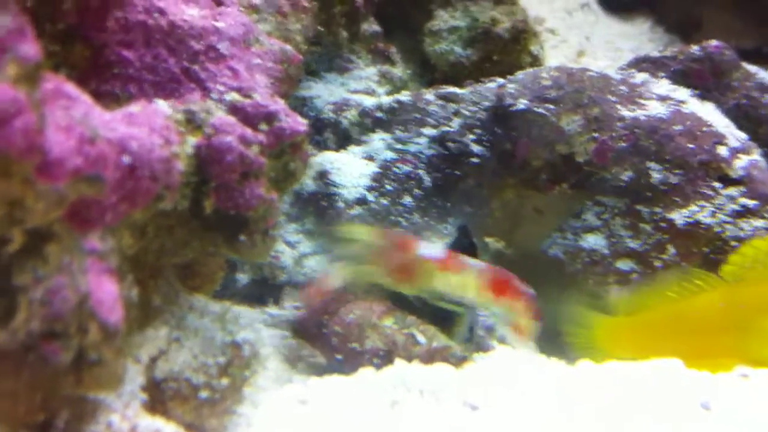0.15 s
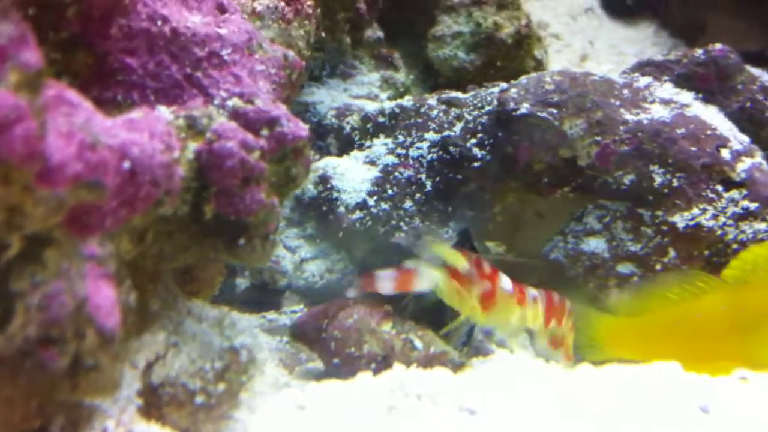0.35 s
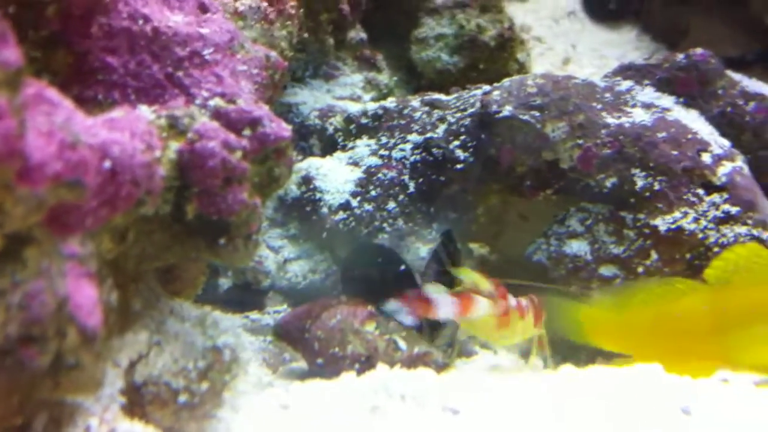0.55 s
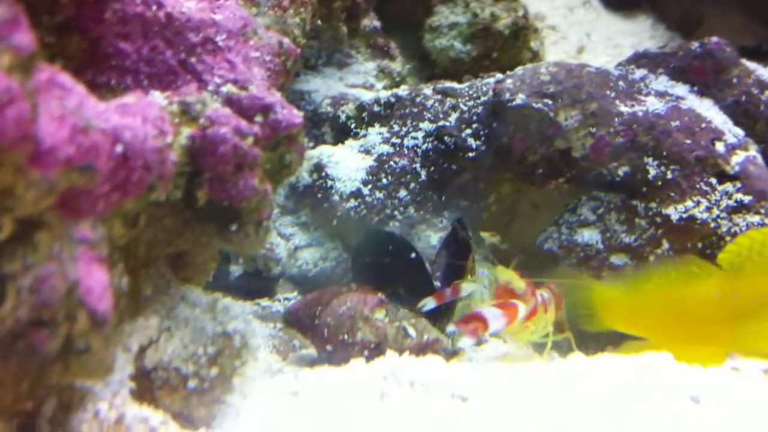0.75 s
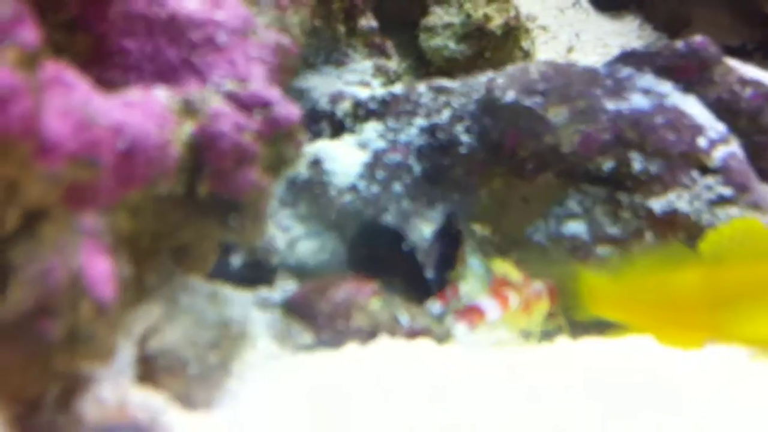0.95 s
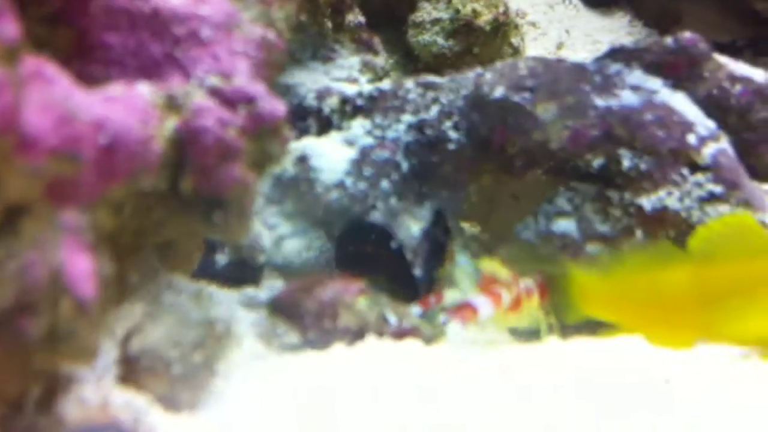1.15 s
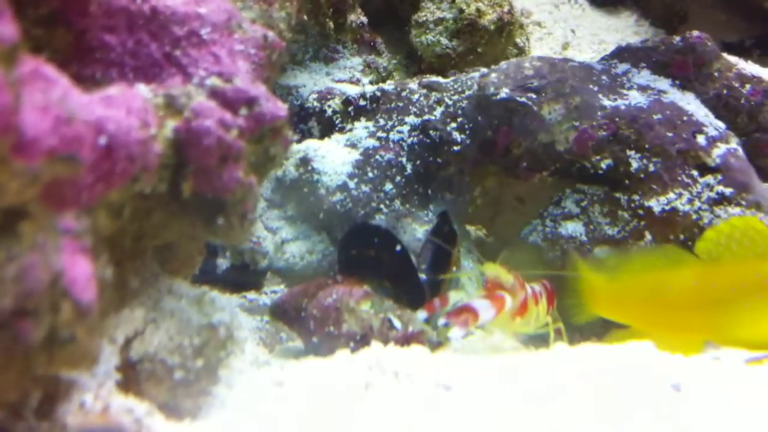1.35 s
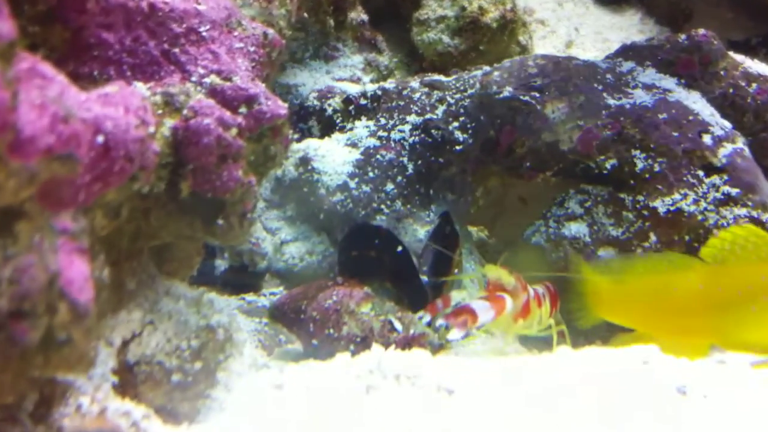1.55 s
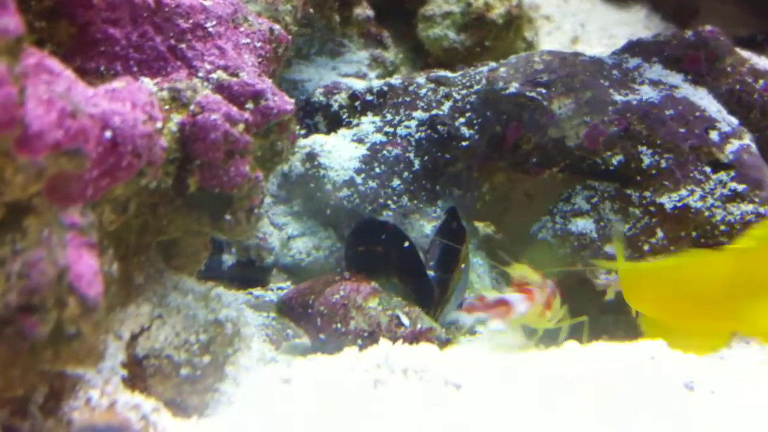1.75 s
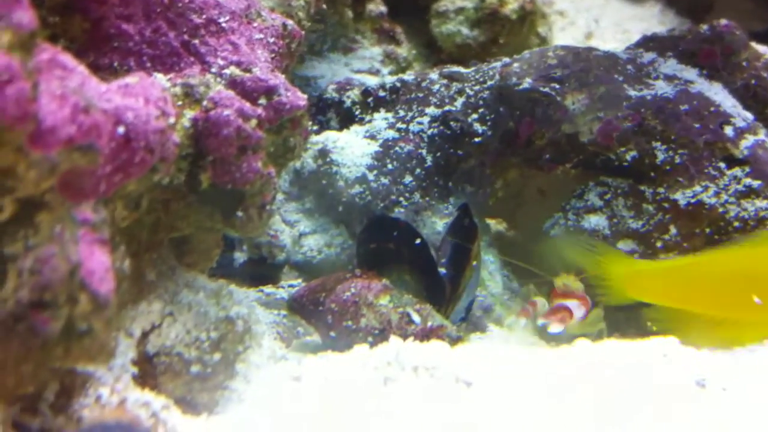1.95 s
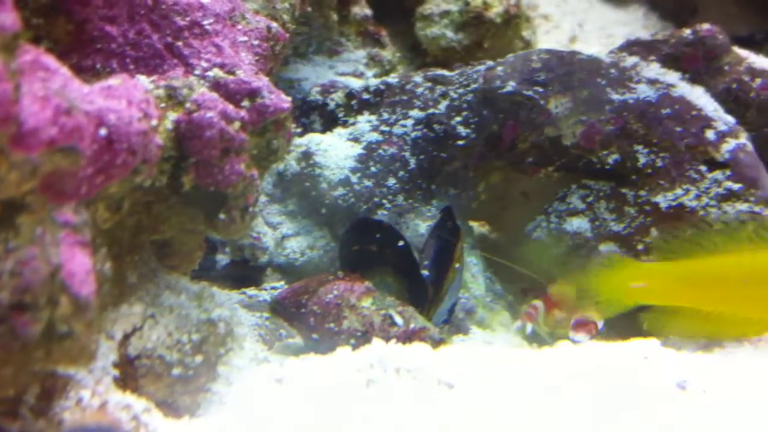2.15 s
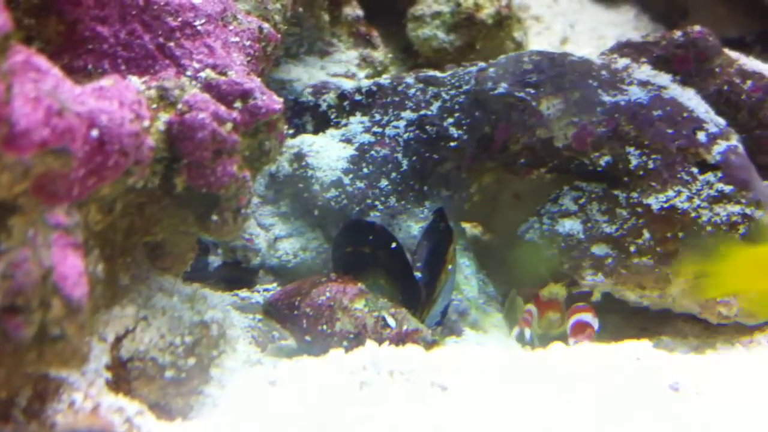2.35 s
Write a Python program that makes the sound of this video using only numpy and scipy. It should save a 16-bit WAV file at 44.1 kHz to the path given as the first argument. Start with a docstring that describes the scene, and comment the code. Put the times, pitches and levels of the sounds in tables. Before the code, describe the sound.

A pistol shrimp snaps once, very sharp and loud, near the start; the tank glass rings briefly and the room answers faintly. A quiet wavering pump hum and microphone hiss continue, with one tiny late tick.

```python
"""An aquarium pump runs throughout: wavering shaft sines, mains hum, churning noise, under microphone hiss.
At 0.2 s a pistol shrimp snaps: its bubble collapses in one sharp pulse, which rattles between the panes
as a few milliseconds of noise and rings the glass as decaying modes.
A near wall repeats the snap and the room answers with a faint tail of fading noise.
At 1.8 s one tiny tick sounds in the tank, a short noise burst."""
import sys
import numpy as np
from scipy import signal
from scipy.fft import rfft, irfft, next_fast_len
from scipy.io import wavfile
from scipy.ndimage import map_coordinates

SR = 44100
rng = np.random.default_rng(int(sys.argv[2]) if len(sys.argv) > 2 else 0)


def waveform_to_disk(signal):
    """Save audio, clipped to [-1, 1], as 16-bit WAV at the path in sys.argv[1]."""
    frames = np.transpose(np.atleast_2d(signal))
    scaled = np.clip(frames, -1, 1) * 32767
    samples = np.round(scaled).astype(np.int16)
    wavfile.write(sys.argv[1], SR, samples)


N = 110250


def amp(db):
    """Decibels to gain."""
    return 10 ** (np.asarray(db) / 20)


def unit(x):
    """Scale to rms 1."""
    return x / np.sqrt(np.mean(x ** 2) + 1e-20)


def along(points, hz):
    """Interpolate (freq_hz, value) points on a log-frequency axis."""
    point_hz, value = np.transpose(points)
    return np.interp(np.log(hz + 1), np.log(point_hz + 1), value)


def since(start_s):
    """Seconds since a moment, zero before it."""
    return np.maximum(np.arange(N) / SR - start_s, 0)


def wobble(knots_per_s):
    """Smooth random curve: a spline through normal random knots."""
    knots = rng.standard_normal(256)
    return map_coordinates(knots, [np.arange(N) * knots_per_s / SR], mode="mirror")


def filtered(x, response):
    """Multiply the spectrum of x by response(freq_hz), zero-padded."""
    size = next_fast_len(N + 8192)
    freq_hz = np.fft.rfftfreq(size, 1 / SR)
    return irfft(rfft(x, size) * response(freq_hz), size)[:N]


def noise(colour):
    """Noise of rms 1 with a (freq_hz, level_db) spectrum."""
    return unit(filtered(rng.standard_normal(N), lambda f: amp(along(colour, f))))


def narrow(centre_hz, width_hz):
    """Noise of rms 1 in one steep resonance."""
    return unit(filtered(rng.standard_normal(N), lambda f: 1 / (1 + ((f - centre_hz) / width_hz * 2) ** 2)))


def burst(start_s, hold_s, t60_s):
    """Envelope: instant attack, hold, exponential release."""
    return (since(start_s) > 0) * amp(-60 * since(start_s + hold_s) / t60_s)


SNAP_S = 0.2152
# collapse pulse as it leaves the tank: freq_hz, level_db
PULSE_COLOUR = [(200, -42), (800, -27), (1100, -4), (1900, 1.5), (2500, 1), (3300, -6.5), (4800, -5.5),
                (6600, -3), (8800, -20), (10400, 3.5), (12700, -8), (14500, -9), (16500, -23)]


def pulse(start_s, colour):
    """Minimum-phase pulse: folding the cepstrum puts all energy after the onset."""
    freq_hz = np.fft.rfftfreq(N, 1 / SR)
    cepstrum = irfft(np.log(amp(along(colour, freq_hz))), N)
    cepstrum[1:N // 2] *= 2
    cepstrum[N // 2 + 1:] = 0
    impulse = irfft(np.exp(rfft(cepstrum)), N)
    return np.pad(impulse, (round(start_s * SR), 0))[:N]


# spectrum of the reflections between the panes: freq_hz, relative_db
CRACK_COLOUR = [(300, -44), (850, -33), (1150, -12), (2200, -11.5), (3000, -10.5), (4800, 0.5),
                (5600, -11.5), (6600, 1.5), (8100, 1.5), (8800, -7.5), (10400, 0), (12700, -10),
                (13700, 0.5), (15000, -7.5), (16500, -25)]
CRACK_DB, CRACK_HOLD_S, CRACK_T60_S = -23, 0.0019, 0.016
LINGER_RE_CRACK_DB, LINGER_T60_S = -18.5, 0.071


def crack():
    """Dense pane reflections as noise: level holds, then dies, with a weaker, longer tail."""
    main = burst(SNAP_S, CRACK_HOLD_S, CRACK_T60_S)
    linger = amp(LINGER_RE_CRACK_DB) * burst(SNAP_S, 0, LINGER_T60_S)
    return amp(CRACK_DB) * (main + linger) * noise(CRACK_COLOUR)


# tank modes: freq_hz, relative_db (before GLASS_GAIN_DB), t60_s
GLASS_MODES = [(1887, -40, 0.036), (3210, -41.5, 0.033), (3885, -27, 0.04), (4900, -31.5, 0.019),
               (6040, -33, .016), (6620, -20, 0.015), (7575, -28.5, .023), (8050, -28.5, 0.013),
               (10630, -22.5, 0.016), (11390, -35.5, .016), (12110, -32, .018), (13480, -25, 0.013),
               (14220, -38, .018)]
GLASS_GAIN_DB, GLASS_ATTACK_S = 5.5, 0.0017


def glass():
    """Ringing glass: a sum of exponentially decaying modes with a soft onset."""
    t = since(SNAP_S)
    onset = 1 - np.exp(-t / GLASS_ATTACK_S)
    ring = sum(amp(db - 60 * t / t60_s) * np.cos(2 * np.pi * hz * t) for hz, db, t60_s in GLASS_MODES)
    return amp(GLASS_GAIN_DB) * onset * ring


def snap():
    """Collapse pulse, its reflections between the panes and the ringing glass."""
    return pulse(SNAP_S, PULSE_COLOUR) + crack() + glass()


# spectrum of the room's answer: freq_hz, relative_db
ROOM_COLOUR = [(400, -20), (1100, 2), (3200, -7), (3900, 3), (5300, -4), (6800, 3.5), (8000, 2.5),
               (8800, -7.5), (10400, 4), (11700, -1.5), (12500, -9.5), (14000, 2), (16000, -19)]
# decay of the room: freq_hz, t60_s
ROOM_T60 = [(1000, .45), (4000, 0.49), (8000, 0.43), (15000, 0.29)]
ROOM_DB, ROOM_DELAY_S, ROOM_RING_DB = -49.5, 0.008, -62
WALL_DELAY_S, WALL_DB = 0.011, -22.5


def room(direct):
    """One near wall, then a diffuse tail in which the longest glass mode stands out."""
    wall = filtered(direct, lambda f: amp(WALL_DB) * np.exp(-2j * np.pi * f * WALL_DELAY_S))
    ring_hz = max(GLASS_MODES, key=lambda mode: mode[2])[0]
    diffuse = amp(ROOM_DB) * noise(ROOM_COLOUR) + amp(ROOM_RING_DB) * narrow(ring_hz, width_hz=160)
    # each frequency fades at its own rate
    freq_hz, frame_s, frames = signal.stft(diffuse, SR, nperseg=256)
    t60_s = along(ROOM_T60, freq_hz)[:, None]
    fade = amp(-60 * np.maximum(frame_s - SNAP_S, 0) / t60_s)
    tail = signal.istft(frames * fade, SR, nperseg=256)[1][:N]
    return wall + tail * (since(SNAP_S + ROOM_DELAY_S) > 0)


# faint ticks in the tank: start_s, level_db
TICKS = [(1.772, -60.5)]
# tick spectrum: freq_hz, relative_db
TICK_COLOUR = [(2500, -15), (4200, -11), (5400, 3.5), (6400, -14), (10000, -21)]
TICK_HOLD_S, TICK_T60_S = 0.0018, 0.019


def ticks():
    """Tiny dry clicks: short bursts of coloured noise."""
    envelope = sum(amp(db) * burst(start_s, TICK_HOLD_S, TICK_T60_S) for start_s, db in TICKS)
    return envelope * noise(TICK_COLOUR)


SHAFT_HZ = 36.17
# pump tones: shaft_multiple, rms_db (before waver)
PUMP_TONES = [(2, -98.5), (11, -65.5), (12, -66), (14, -68), (15, -74), (18, -78), (19, -77), (20, -81.5),
              (23, -80.5), (24, -80), (40, -84), (49, -83), (51, -80), (64, -81)]
STRONGEST_MULTIPLE = 10
# swelling level of the strongest tone: time_s, rms_db (before SWELL_GAIN_DB and waver)
SWELL = [(0.0, -62), (0.22, -57), (0.26, -65.5), (0.49, -56), (0.65, -61.5), (0.72, -55), (0.8, -67),
         (0.85, -56.5), (1.05, -59.5), (1.11, -49), (1.25, -67.5), (1.34, -56.5), (1.64, -59),
         (1.72, -50.5), (1.96, -67.5), (2.17, -55.5), (2.48, -60.5), (2.5, -60)]
SWELL_GAIN_DB = -1
WAVER_DB, WAVER_RAD, LEVEL_KNOTS_PER_S, PHASE_KNOTS_PER_S = 2, 0.3, 6.99, 6.03


def shaft_tones():
    """Multiples of the shaft rate, each wavering in level and phase; the strongest also swells."""
    t = since(0)
    swell_db = SWELL_GAIN_DB + np.interp(t, *np.transpose(SWELL))
    total = np.zeros(N)
    for multiple, db in PUMP_TONES + [(STRONGEST_MULTIPLE, swell_db)]:
        level = amp(db + WAVER_DB * wobble(LEVEL_KNOTS_PER_S))
        cycles = multiple * SHAFT_HZ * t + rng.random()
        total += level * np.sin(2 * np.pi * cycles + WAVER_RAD * wobble(PHASE_KNOTS_PER_S))
    return np.sqrt(2) * total  # peak to rms levels


MAINS_HZ = 60
# motor hum: mains_multiple, rms_db
HUM = [(2, -71.5), (4, -85.5)]


def mains_hum():
    """Steady motor hum: sines at multiples of the mains rate."""
    t = since(0)
    tones = sum(amp(db) * np.sin(2 * np.pi * (k * MAINS_HZ * t + rng.random())) for k, db in HUM)
    return np.sqrt(2) * tones


# resonances of pump and stand: centre_hz, width_hz, rms_db
HOUSING = [(374, 64, -61.5), (1836, 77, -80), (2315, 100, -89)]


def housing():
    """Pump and stand resonances as narrow noise bands."""
    return sum(amp(db) * narrow(centre_hz, width_hz) for centre_hz, width_hz, db in HOUSING)


# density of churning water and housing: freq_hz, relative_db_per_hz
CHURN_COLOUR = [(25, -24), (60, -35), (95, -15), (130, -10.5), (185, 1), (280, 0), (420, 2), (480, 0.5),
                (680, -2), (780, -5), (870, -5), (950, -8.5), (1300, -15), (2400, -20.5), (4000, -44.5)]
CHURN_DB = -61


def churn():
    """Turbulent water as steady broadband noise."""
    return amp(CHURN_DB) * noise(CHURN_COLOUR)


def pump():
    """Shaft tones, mains hum, housing resonances and churning water."""
    return shaft_tones() + mains_hum() + housing() + churn()


def scene():
    """The snap, its echo and the tick over the running pump."""
    direct = snap()
    return (direct + room(direct) + ticks() + pump())[None]


# microphone hiss density: freq_hz, relative_db_per_hz
HISS_COLOUR = [(100, -1), (2000, 5.5), (3200, 4), (6000, 2), (10000, -1), (15500, 0)]
HISS_DB, HISS_TOP_HZ = -69, 15800  # level before the cut at the top
MIC_TOP_HZ = 16600


def record(dry):
    """The microphone adds hiss and keeps nothing above its band limit."""
    hiss = amp(HISS_DB) * filtered(noise(HISS_COLOUR), lambda f: f < HISS_TOP_HZ)
    return filtered(dry[0] + hiss, lambda f: f < MIC_TOP_HZ)[None]


dry = scene()
out = record(dry)
waveform_to_disk(out)
```